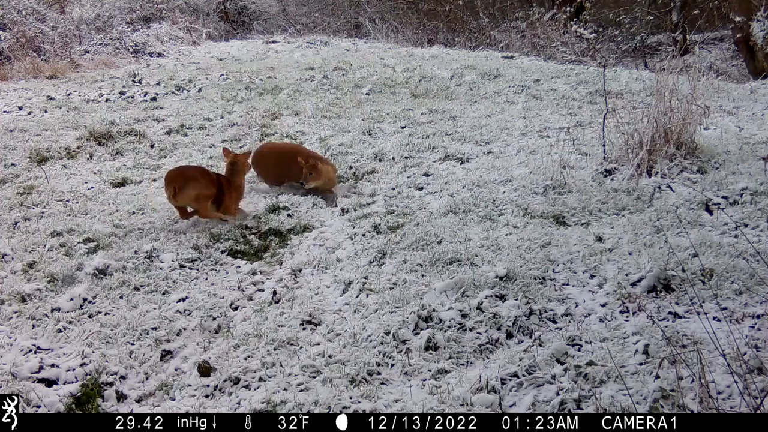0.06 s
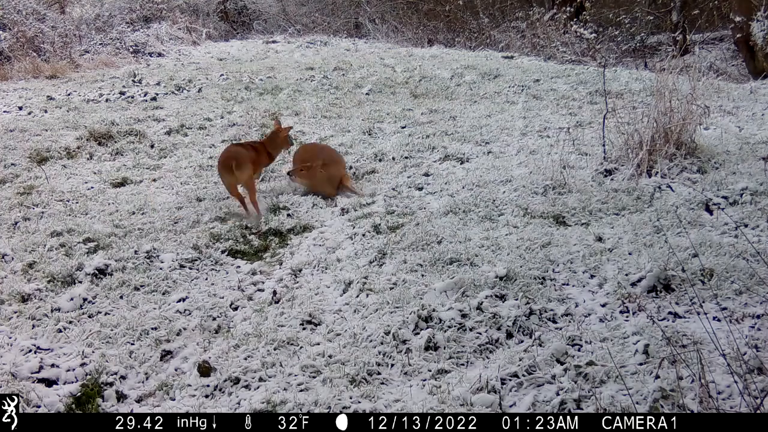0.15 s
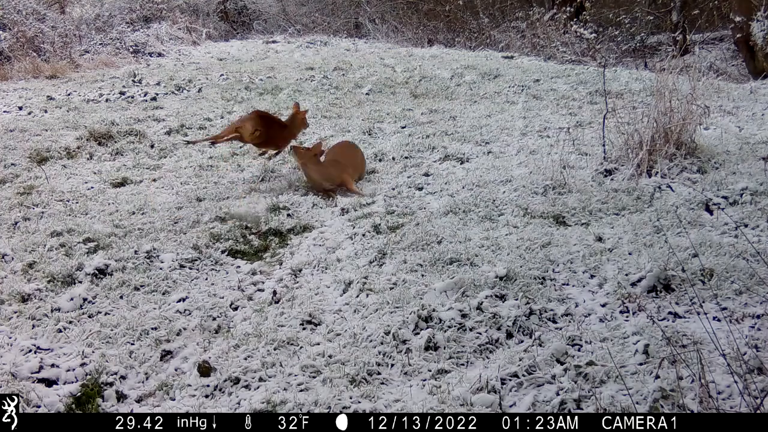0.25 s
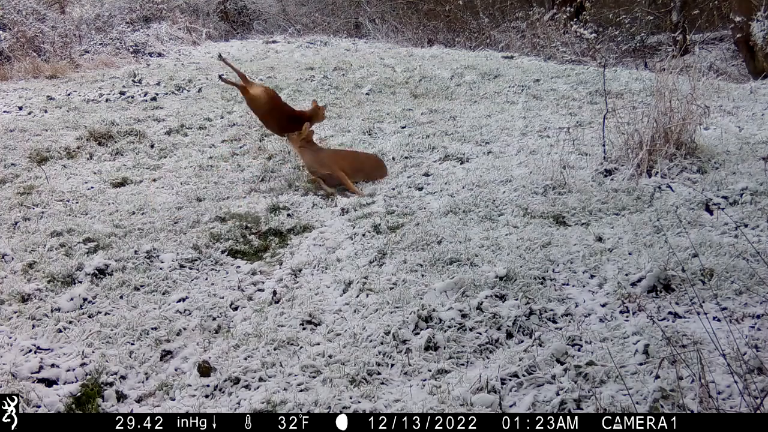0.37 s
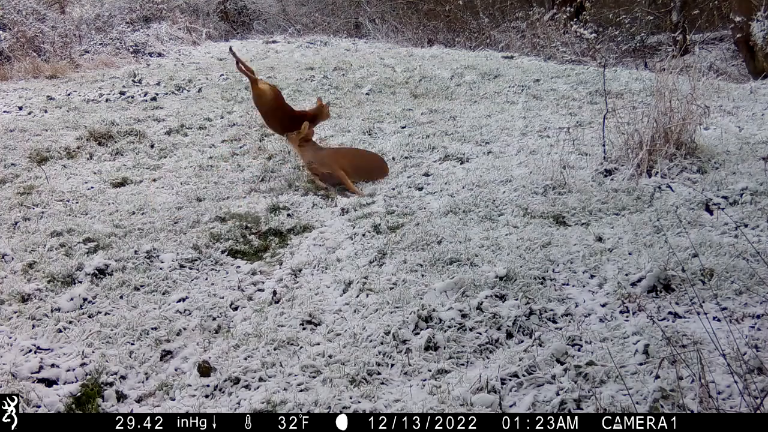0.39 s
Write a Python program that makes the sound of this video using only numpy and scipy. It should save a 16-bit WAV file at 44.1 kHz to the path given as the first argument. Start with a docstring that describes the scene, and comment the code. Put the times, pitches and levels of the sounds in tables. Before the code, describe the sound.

High, squeaky twittering from two fighting deer comes in three short bursts, echoing slightly off the trees. Light crunches of snow and frozen grass mix in, while the microphone adds a low hiss and a faint electronic tone.

```python
"""Deer fight in snow

Two small deer fight on a meadow in front of a trail camera. One squeaks in three quick twitters:
runs of short whistled pips, each falling in pitch, that echo from the trees. Hooves scuff the snow
and snap frozen grass. The camera starts after a moment of silence and adds hiss and a thin whine."""
import sys
import numpy as np
from scipy import signal
from scipy.fft import rfft, irfft, next_fast_len
from scipy.io import wavfile
from scipy.ndimage import map_coordinates

SR = 44100
rng = np.random.default_rng(int(sys.argv[2]) if len(sys.argv) > 2 else 0)


def dump(signal):
    """Clip the signal to [-1, 1] and save it as 16-bit WAV at the path in sys.argv[1]."""
    limited = np.clip(np.atleast_2d(signal).T, -1, 1)
    pcm = np.round(limited * 32767).astype(np.int16)
    wavfile.write(sys.argv[1], SR, pcm)


N = 72765

# microphone hiss: freq_hz, gain_db
HISS_SPECTRUM = [(25, -19.5), (75, -15.5), (200, -8.5), (320, -6), (680, -3), (1000, -4), (1500, -6.5),
                 (2200, -8), (3000, -13.5), (3700, -20.5), (4400, -20.5), (5200, -36), (7000, -47),
                 (10000, -56)]
# top of the hiss: freq_hz, gain_db
FIZZ_SPECTRUM = [(3000, -16.5), (6500, 6), (9000, 2.5), (11000, -3), (15500, 2)]
# buzz of the whine: freq_hz, gain_db
WHINE_SPECTRUM = [(3000, 18), (5300, 17), (6500, 5), (7500, 3), (8100, 0), (10000, -19), (15000, 2)]
# hoof scuffs: start_s, length_s, level_db
HOOF_SCUFFS = [(0.19, 0.091, -37), (0.477, .035, -56), (0.653, 0.03, -45.5), (0.691, .048, -46),
               (1.038, 0.04, -42), (1.084, 0.034, -43)]
# scuffed snow: freq_hz, gain_db
SCUFF_SPECTRUM = [(200, -10), (700, -17), (1500, -0.5), (2400, 5.5), (3300, -3.5), (4400, -4), (5400, -30),
                  (7000, -32), (10500, -35), (13000, -46), (15500, -60)]
# snaps of frozen grass: start_s, level_db
GRASS_SNAPS = [(.2217, -33.5), (0.2609, -31.5), (0.6648, -28.5), (0.698, -40), (0.7296, -23), (1.047, -28),
               (1.332, -36)]
# snapping stalk: freq_hz, gain_db
SNAP_SPECTRUM = [(300, -28), (1500, -5.5), (2400, 2.5), (3300, -15), (4400, -5), (5500, -37), (9000, -32.5),
                 (15000, -63)]
# fine rustle of snow: time_s, level_db
RUSTLE_LEVELS = [(.2, -63), (.25, -55), (.31, -59), (.46, -59.5), (.50, -53.5), (.58, -64.5), (.66, -55.5),
                 (.73, -51), (.79, -63), (.88, -55.5), (.93, -54.5), (.98, -57.5), (1.02, -57.5),
                 (1.05, -49.5), (1.18, -63), (1.23, -57.5), (1.54, -66), (1.62, -56)]
# rustling snow crystals: freq_hz, gain_db
RUSTLE_SPECTRUM = [(2000, -19), (3300, 1.5), (4500, 9), (5500, -17), (7500, -18.5), (10000, -16.5),
                   (11500, -20), (13000, -27), (15500, -35)]
# ticks of the voice: start_s, level_db
VOICE_TICKS = [(0.3754, -20.5), (0.3845, -29), (0.402, -25), (0.4095, -29), (0.4232, -32), (0.4433, -35),
               (1.0538, -36.5), (1.058, -37)]
# squeals that open a call: start_s, length_s, pitch_hz, fall_hz, level_db
VOICE_SQUEALS = [(0.1947, 0.0172, 2950, 856, -32.5), (0.6645, 0.0174, 2610, 874, -29)]
# whistled pips: start_s, length_s, peak_fraction, pitch_hz, fall_hz, level_db
VOICE_PIPS = [(0.187, .024, 1, 2405, 612, -30), (.3756, .008, 0.05, 2556, 420, -17.5),
              (.4026, 0.0046, 0.11, 2637, 200, -16), (0.4071, 0.0026, 0.2, 2340, 152, -24.5),
              (.4244, 0.0036, 0.37, 2570, 161, -18), (.428, 0.0052, 0.6, 2414, 330, -25),
              (.4426, 0.0122, 0, 2480, 304, -26), (.4626, 0.0057, 0.5, 2172, 170, -24),
              (0.4738, .018, 0.3, 1882, 440, -33), (.6976, 0.0083, 0.02, 2577, 50, -26),
              (0.7007, 0.0056, 0.8, 2553, 220, -14), (.7155, .0064, 0.52, 2516, 234, -11.5),
              (0.7432, .008, 0.59, 2510, 315, -11), (0.7689, .0072, 0.62, 2257, 173, -15.5),
              (0.7774, 0.033, 0.44, 2010, 409, -34.5), (1.048, 0.0074, .55, 2690, 430, -28.5),
              (1.062, 0.0067, 0.6, 2490, 149, -28), (1.0905, 0.0081, 0.36, 2654, 263, -20),
              (1.1224, 0.0077, 0.72, 2702, 297, -18), (1.142, .008, 0.02, 2686, 59.6, -27),
              (1.1473, 0.0051, .45, 2420, 180, -19), (1.169, 0.0049, 0, 1950, 404, -34.5)]

TIME_S = np.arange(N) / SR


def amp(db):
    """Decibels to gain."""
    return 10 ** (np.asarray(db) / 20)


def unit(x):
    """Scale to rms 1."""
    return x / np.sqrt(np.mean(x ** 2) + 1e-20)


def add(track, start_s, x):
    """Mix x into the track."""
    part = track[max(round(start_s * SR), 0):][:len(x)]
    part += x[:len(part)]


def wobble(rate_hz):
    """Smooth random curve, rate_hz knots a second."""
    return map_coordinates(rng.standard_normal(N // 8), [TIME_S * rate_hz], mode="wrap")


def filtered(x, response):
    """Apply a gain given as a function of frequency."""
    size = next_fast_len(len(x) + 8192)
    return irfft(rfft(x, size) * response(np.fft.rfftfreq(size, 1 / SR)), size)[:len(x)]


def coloured(x, spectrum):
    """Shape x by (freq_hz, gain_db) points on a log axis."""
    freq_hz, gain_db = np.transpose(spectrum)
    return filtered(x, lambda hz: amp(np.interp(np.log(hz + 1), np.log(freq_hz + 1), gain_db)))


def noise(spectrum):
    """Coloured noise, rms 1."""
    return unit(coloured(rng.standard_normal(N), spectrum))


def swell(length_s, peak_fraction):
    """Progress 0-1 through a sound, and its rounded envelope."""
    progress = np.arange(int(length_s * SR)) / (length_s * SR)
    skewed = np.interp(progress, [0, np.clip(peak_fraction, .02, .98), 1], [0, .5, 1])
    return progress, np.abs(np.sin(np.pi * skewed))


def hiss(level_db=-44, waver_db=.5, fizz_db=-71.5):
    """Steady microphone noise with a faint fizz on top."""
    body = amp(level_db + waver_db * wobble(6.7)) * noise(HISS_SPECTRUM)
    return body + amp(fizz_db) * noise(FIZZ_SPECTRUM)


def whine(pitch_hz=7800, step_hz=59.4, step_rad=3.55, octave_db=-93):
    """Camera interference: a thin tone that buzzes from regular phase jumps."""
    steps = np.floor((TIME_S - 1.3053) * step_hz)
    phase = 2 * np.pi * pitch_hz * TIME_S - step_rad * steps
    buzz = coloured(amp(-57) * np.sin(phase), WHINE_SPECTRUM)
    return buzz + amp(octave_db) * np.sin(2 * phase)


def echo(x, centre_db, t60_s, centre_hz, width_hz, delay_s=.0063):
    """Diffuse scatter of x in one band."""
    tail = rng.standard_normal(N) * amp(-60 * TIME_S / t60_s) * (TIME_S > delay_s)
    band = lambda hz: 1 / np.sqrt(1 + ((hz - centre_hz) / (width_hz / 2)) ** 2)
    impulse_response = filtered(tail / np.linalg.norm(tail), band)
    return amp(centre_db) * signal.fftconvolve(x, impulse_response)[:N]


def hooves(snap_rise_s=.00022, snap_decay_s=.0015, swing_db=3, crunch_db=3.5):
    """Crunchy scuffs and fine rustle of snow; single snaps of frozen grass."""
    scuff_env, snap_env = np.zeros(N), np.zeros(N)
    for start_s, length_s, level_db in HOOF_SCUFFS:
        _, env = swell(length_s, peak_fraction=.55)
        add(scuff_env, start_s, amp(level_db) * env ** .5)
    snap = np.exp(-TIME_S / snap_decay_s) * (1 - np.exp(-TIME_S / snap_rise_s))
    for start_s, level_db in GRASS_SNAPS:
        add(snap_env, start_s, amp(level_db) * snap)
    rustle_env = amp(np.interp(TIME_S, *np.transpose(RUSTLE_LEVELS)) + swing_db * wobble(59.76))
    crunch = unit(amp(crunch_db * wobble(500)))
    snow = scuff_env * noise(SCUFF_SPECTRUM) + rustle_env * noise(RUSTLE_SPECTRUM)
    return crunch * snow + snap_env * noise(SNAP_SPECTRUM)


def ticks(length_s=.0026, pitch_hz=3655, fall_hz=712):
    """Very short, steep whistles that give the twitter its edge."""
    out = np.zeros(N)
    progress, env = swell(length_s, peak_fraction=.6)
    phase = 2 * np.pi * np.cumsum(pitch_hz - fall_hz * progress) / SR
    for start_s, level_db in VOICE_TICKS:
        add(out, start_s, amp(level_db) * env * np.sin(phase))
    return out


def squeals(roughness=.14, overtone_db=-6.5, cutoff_hz=4410):
    """Abrupt, reedy glides; the overtone comes through as the pitch drops."""
    out = np.zeros(N)
    grain = 1 + roughness * wobble(1800)
    for start_s, length_s, pitch_hz, fall_hz, level_db in VOICE_SQUEALS:
        progress, env = swell(length_s, peak_fraction=.1)
        glide_hz = pitch_hz - fall_hz * np.sin(np.pi / 2 * progress)
        phase = 2 * np.pi * np.cumsum(glide_hz) / SR
        overtone_gain = amp(overtone_db) / (1 + (2 * glide_hz / cutoff_hz) ** 20)
        tone = np.sin(phase) + overtone_gain * np.sin(2 * phase)
        add(out, start_s, amp(level_db) * env * tone)
    return out * grain


def twitter(fall_curve=1.277, roundness=.77, overtone_db=-41.5, rasp_below_db=-21, rasp_per_db=.012):
    """Whistled pips that fall in pitch; the weak ones are rough."""
    out = np.zeros(N)
    flutter = wobble(1500) + 1j * wobble(1500)  # amplitude and phase
    for start_s, length_s, peak_fraction, pitch_hz, fall_hz, level_db in VOICE_PIPS:
        progress, env = swell(length_s, peak_fraction)
        phase = 2 * np.pi * np.cumsum(pitch_hz - fall_hz * progress ** fall_curve) / SR
        tone = np.exp(1j * phase) + amp(overtone_db) * np.exp(2j * phase)
        roughness = .023 + rasp_per_db * max(rasp_below_db - level_db, 0)
        grain = 1 + roughness * flutter[round(start_s * SR):][:len(env)]
        add(out, start_s, amp(level_db) * env ** roundness * (tone * grain).imag)
    return out


def scene(turn_s=.95, turn_db=5):
    """Deer, echoes from ground and trees, camera noise."""
    deer = twitter() + squeals() + ticks() + hooves()
    toward_trees = amp(turn_db * (TIME_S > turn_s))  # last call echoes more, as if turned to the trees
    ground = echo(deer, centre_db=-11.5, t60_s=.075, centre_hz=2600, width_hz=870)
    trees = echo(deer * toward_trees, centre_db=-11, t60_s=.63, centre_hz=2660, width_hz=480)
    return (deer + ground + trees + hiss() + whine())[None]


def record(dry, start_s=.195, fade_s=.0015, top_hz=15800):
    """Camera: late start, hard band limit."""
    running = np.clip((TIME_S - start_s) / fade_s, 0, 1)
    return filtered(dry[0] * running, lambda hz: hz < top_hz)[None]


dry = scene()
out = record(dry)
dump(out)
```